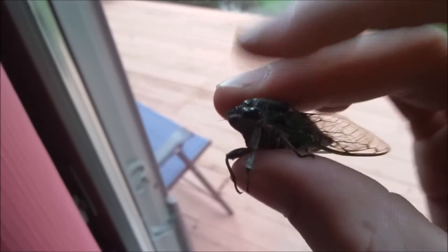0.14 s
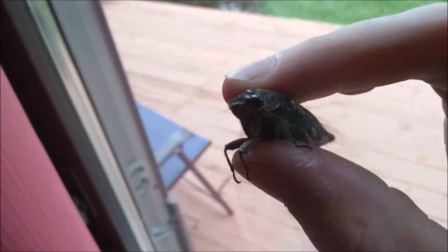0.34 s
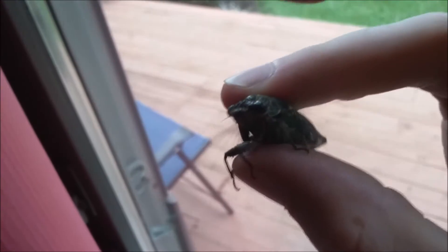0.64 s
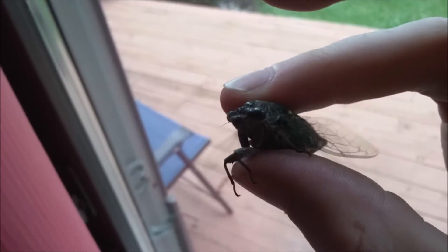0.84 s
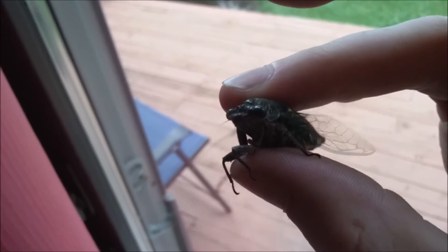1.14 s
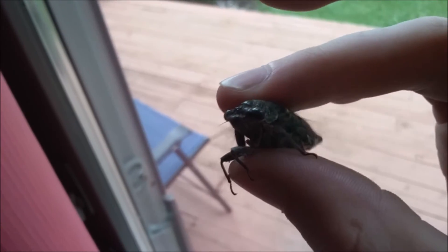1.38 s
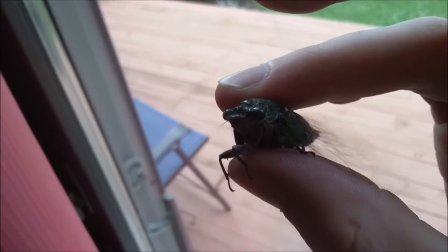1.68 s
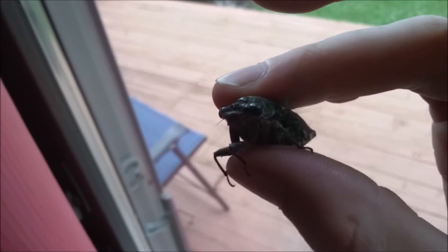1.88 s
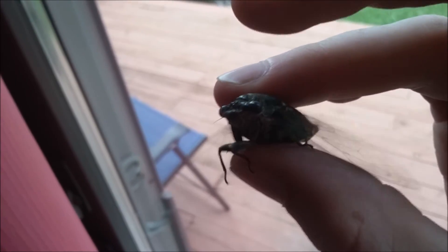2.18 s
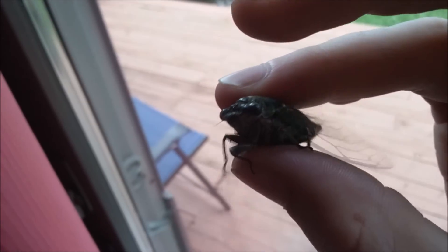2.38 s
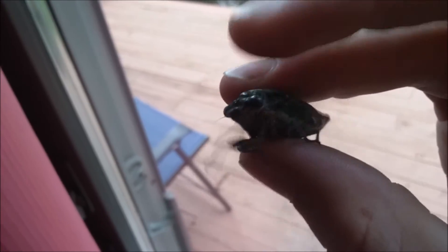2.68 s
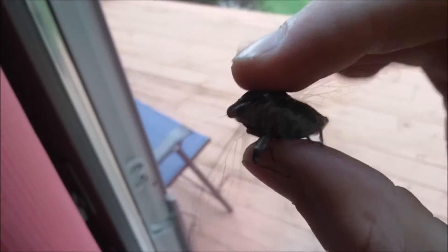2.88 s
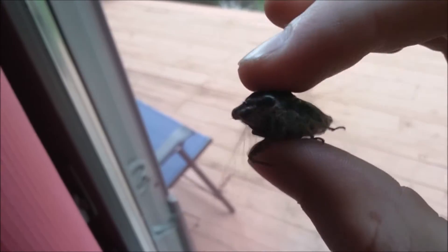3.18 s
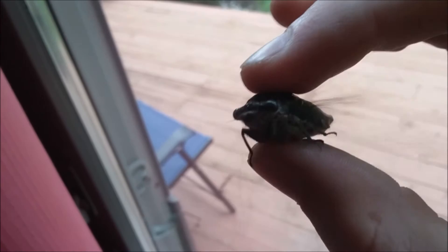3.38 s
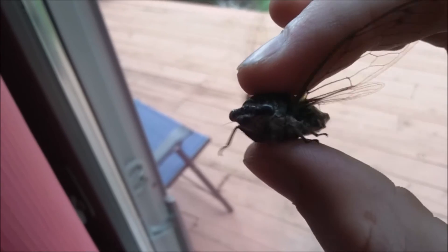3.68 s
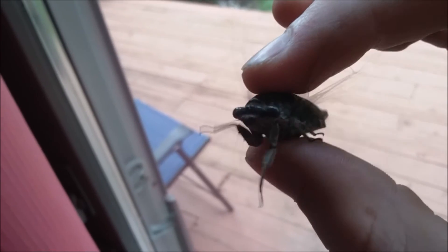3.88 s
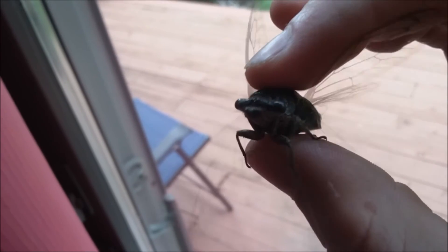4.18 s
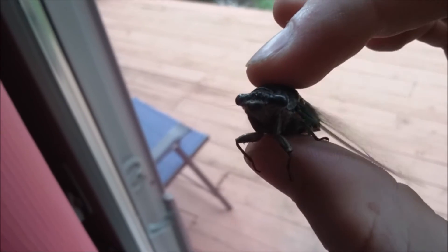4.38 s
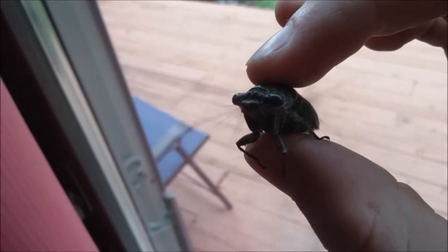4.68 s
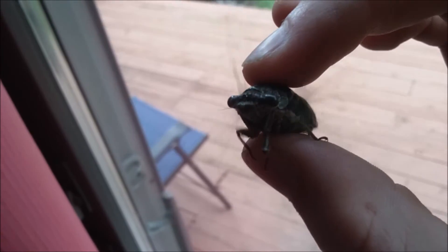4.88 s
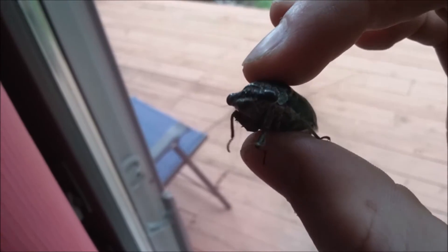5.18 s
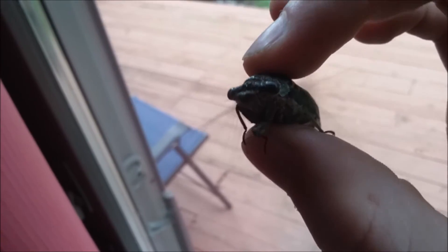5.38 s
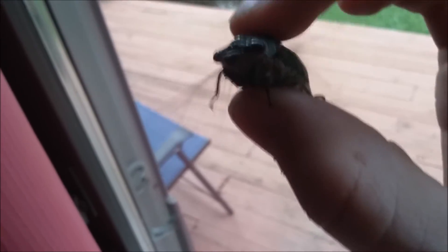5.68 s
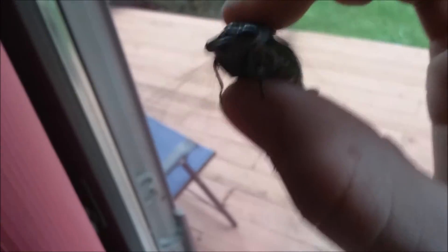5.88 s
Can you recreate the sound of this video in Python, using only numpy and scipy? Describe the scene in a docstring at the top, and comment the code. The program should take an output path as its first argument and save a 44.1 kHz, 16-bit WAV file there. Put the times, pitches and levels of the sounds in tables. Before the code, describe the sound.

Stiff insect wings slap against skin at close range: soft papery flutters first, then hard dry clicks with thin, hissy crackle, uneven and nervous. Fine rustling fills the gaps, and each stroke pushes a soft low flutter of air with a dim droning tone. The beating grows steady and rapid, ending in a buzzing rattle at nearly forty beats a second. The background is a quiet, low ambience.

```python
"""Cicada held in a doorway

A cicada held between finger and thumb beats its wings close to the microphone, in fits, then in a fast rattle.
Each hard contact is a noise burst around a sharp click, where a stiff wing bends and snaps; glancing contacts
are soft swells of tiny slips, and clumped noise rustles in between. The moved air is puffs and noisy eddies that
excite low room resonances, joined by two wavering tones. Faint reflections and quiet ambience lie behind."""
import sys
import numpy as np
from scipy import signal
from scipy.fft import rfft, irfft
from scipy.io import wavfile
from scipy.ndimage import uniform_filter1d

SR = 44100
rng = np.random.default_rng(int(sys.argv[2]) if len(sys.argv) > 2 else 0)


def wav_out(sig):
    """Save sig, one row per channel (or a flat mono array), as 16-bit PCM at SR to the path in sys.argv[1]."""
    wavfile.write(sys.argv[1], SR, np.round(np.clip(np.atleast_2d(sig).T, -1, 1) * 32767).astype(np.int16))


N = 266364
CONTACT_S = .005   # the energy of a contact counts as spread over this time when its level is set
AGE = np.arange(1536) / SR   # seconds since the start of one contact
CUTOFF_HZ = 16500   # top of the recorded band

# Air moved by the wings. Each row: time in seconds, level in dB.
DRAUGHT = [(0.0, -74), (0.05, -64.5), (0.2, -67.5), (0.5, -48.5), (0.84, -45), (0.99, -63), (1.04, -51),
           (1.21, -46), (1.97, -50.5), (2.17, -45), (2.37, -55), (2.49, -49), (2.51, -44), (2.84, -54.5),
           (3.33, -51), (3.35, -54.5), (4.41, -47.5), (4.49, -60), (4.54, -47), (6.04, -45)]
# Colour of wing veins brushing the skin. Each row: frequency in Hz, relative density in dB per Hz.
BRUSH_COLOUR = [(4400, -59), (7500, -19), (8500, -13), (9500, 1.5), (12000, 5.5), (12800, 9.5), (15000, 14),
                (15800, 13), (16400, -62)]
# Colour of the wing membrane. Each row: frequency in Hz, relative density in dB per Hz.
MEMBRANE_COLOUR = [(300, -14.5), (520, -1.5), (800, 1), (1200, -0.5), (1550, -3.5), (1900, 1), (2900, 3.5),
                   (3200, 0), (3550, 4), (4200, 1), (4800, -3), (6800, 1.5), (7500, -2), (8500, 0.5),
                   (11000, -12)]


def from_db(db):
    """Decibels to amplitude gain."""
    return 10 ** (np.asarray(db) / 20)


def rms_one(x):
    """Scale to rms 1."""
    return x / np.sqrt(np.mean(x ** 2) + 1e-20)


def in_time(rows):
    """Each value column of a curve, interpolated at every sample."""
    s, *columns = np.transpose(rows)
    return [np.interp(np.arange(N) / SR, s, column) for column in columns]


def coloured(x, points):
    """Causal (minimum-phase) filter with the given spectrum, along the last axis."""
    hz, db = np.transpose(points)
    grid = np.maximum(np.fft.rfftfreq(8192, 1 / SR), 1)
    gain = from_db(np.interp(np.log(grid), np.log(hz), db))
    # folding the cepstrum onto positive times makes the response minimum-phase
    cepstrum = irfft(np.log(gain))
    half = len(cepstrum) // 2
    cepstrum[1:half] *= 2
    cepstrum[half + 1:] = 0
    response = irfft(np.exp(rfft(cepstrum)))[:min(half, x.shape[-1])]
    filtered = signal.fftconvolve(np.atleast_2d(x), response[None], axes=1)
    return filtered[:, :x.shape[-1]].reshape(x.shape)


def resonance(x, hz, width_hz):
    """Two-pole resonance with gain 1 on top."""
    r = np.exp(-np.pi * width_hz / SR)
    numerator = np.array([1, 0, -1]) * (1 - r * r) / 2
    return signal.lfilter(numerator, [1, -2 * r * np.cos(2 * np.pi * hz / SR), r * r], x)


def grains(shape, uneven_db):
    """Dense tiny slips of uneven size; rms 1."""
    size_db = uneven_db * np.clip(rng.standard_normal(shape), -2, 2)
    return rms_one(rng.standard_normal(shape) * from_db(size_db))


def placed(sounds, times, levels_db):
    """Set each short sound to its level and lay it at its time."""
    out = np.zeros(N + 2 * len(AGE))
    for sound, s, db in zip(sounds, times, levels_db):
        at = max(round(s * SR), 0)
        contact_rms = np.sqrt(np.sum(sound ** 2) / (CONTACT_S * SR))
        out[at:at + len(AGE)] += from_db(db) * sound / contact_rms
    return out[:N]


def struck_spots(sounds, low_hz, high_hz, width_hz, gain_db):
    """Every contact meets another spot of the wing and brings out a resonance of its own."""
    centres = np.minimum(low_hz * (high_hz / low_hz) ** rng.random(len(sounds)), CUTOFF_HZ)
    return [x + from_db(gain_db) * resonance(x, hz, width_hz) for x, hz in zip(sounds, centres)]


def contacts():
    """All touches -> (hard hits in order of time, soft brushing sounds)."""
    # Fitful single snaps. Each row: time in seconds, then crackle, membrane and backstroke level in dB.
    wing_beats = [(0.3136, -35.5, -43, -68), (0.4241, -39, -55, -49), (0.8125, -33.5, -45, -43),
                  (1.3972, -33.5, -44.5, -44), (1.5561, -35, -46.5, -48), (1.7539, -30.5, -34, -46),
                  (1.8225, -24, -32, -63), (1.8745, -30.5, -35.5, -50), (1.9324, -34, -39, -55),
                  (2.0614, -28.5, -38, -41), (2.1554, -25, -37, -43), (2.1879, -30, -39, -41),
                  (2.2189, -23.5, -36.5, -41), (2.331, -25.5, -32.0, -52), (2.4148, -24.5, -34.0, -58),
                  (2.4581, -25, -35.5, -49), (2.5538, -33, -37, -44), (2.5799, -24, -32.5, -42),
                  (2.6308, -25, -36, -40), (2.6752, -32.5, -39, -36), (2.7346, -27.5, -34.5, -41),
                  (2.7836, -28.5, -38.5, -39.5), (2.8784, -29.5, -50.5, -53), (2.9351, -33.5, -44.5, -43),
                  (2.996, -22.5, -39, -42), (3.0322, -23.5, -40, -40), (3.0762, -26.5, -36.5, -41),
                  (3.1411, -28, -38.5, -50), (3.208, -26.5, -36, -43.5), (3.2762, -24, -39.5, -40),
                  (3.3096, -27.5, -38.5, -56), (3.3802, -25.5, -40.0, -37.5), (3.4557, -28, -40.5, -38.5),
                  (3.5095, -21, -35.5, -55), (3.5815, -27, -38, -40.5), (3.6439, -27, -40, -39.5),
                  (3.6856, -31.5, -39, -61), (3.7532, -28.5, -40, -35.5), (3.8296, -26.5, -42, -41.5),
                  (3.8636, -30.5, -46, -41), (3.9452, -35, -49, -40.5), (3.971, -26.5, -40.5, -40.5),
                  (4.0214, -27.5, -41.5, -38), (4.046, -23.5, -37.5, -42.5), (4.0806, -21, -36.5, -45),
                  (4.1286, -26, -37.5, -50), (4.2273, -26, -33.5, -36), (4.2475, -33, -37, -64),
                  (4.3187, -30, -38.5, -44), (4.3455, -24, -36, -36), (4.3818, -27.5, -39.5, -46),
                  (4.4163, -26, -31.5, -52), (4.5004, -31, -38.5, -55), (4.5866, -28.5, -38, -47.5),
                  (4.6211, -27.5, -37.5, -44), (4.6534, -28, -36.5, -53), (4.7084, -25, -36, -48),
                  (5.0721, -32.5, -34, -42)]
    # Runs of even, snapping beats. Each row: first and last beat in seconds, beats per second,
    # then crackle, membrane and backstroke level in dB.
    rattles = [(1.644, 1.709, 30, -34, -40.5, -52), (4.751, 4.814, 32, -26.5, -39.5, -41.5),
               (4.851, 4.909, 34, -28, -41, -46), (4.967, 5.026, 34, -22.5, -39, -44.5),
               (5.109, 5.241, 38, -25, -39, -41.5), (5.268, 5.538, 37, -22.5, -37, -43),
               (5.570, 5.681, 36, -26, -38.5, -38), (5.710, 6.026, 38, -23, -35.5, -41.5)]
    # Runs of softer sounds, most of them wings brushing the skin; those from 2.482 and 4.176 s are brief
    # smeared swishes. Each row: first and last beat in seconds, beats per second, then crackle and membrane
    # level in dB.
    flutters = [(0.367, 0.438, 28, -40, -51), (0.500, 0.685, 32, -47.5, -47.5),
                (0.711, 0.834, 32, -42, -43.5), (0.870, 0.920, 20, -42, -54), (1.029, 1.061, 31, -46, -50),
                (1.111, 1.351, 21, -39.5, -43), (1.381, 1.513, 30, -58, -47), (1.954, 1.996, 24, -41, -44),
                (2.072, 2.106, 59, -39, -41), (2.255, 2.292, 27, -44, -50),
                (2.482, 2.532, 40, -31.5, -47.5), (4.176, 4.213, 54, -33, -39.5),
                (4.536, 4.552, 62, -38, -51), (4.926, 4.939, 77, -38, -40)]
    hits = np.vstack([wing_beats, beats(rattles)])
    hits = hits[np.argsort(hits[:, 0])]
    return hits, np.vstack([backstrokes(hits), beats(flutters)])


def beats(runs, jitter_s=.0003, spread_db=2.16):
    """Fill each run with nearly even beats -> rows (s, the run's levels in dB)."""
    rows = []
    for first, last, per_s, *levels_db in runs:
        count = round((last - first) * per_s) + 1
        rows += [(s, *levels_db) for s in np.linspace(first, last, count)]
    rows = np.array(rows)
    chance = rng.standard_normal(rows.shape)
    times = rows[:, 0] + jitter_s * chance[:, 0]
    return np.column_stack([times, rows[:, 1:] + spread_db * chance[:, 1:]])


def backstrokes(hits, lead_share=.36, lead_max_s=.029, pause_s=.09):
    """Before a snap the returning wing brushes the skin -> rows (s, crackle dB, membrane dB)."""
    # Crackle and membrane level in dB, relative to the strength of the backstroke.
    parts_db = (3, 0.5)
    s, _, _, backstroke_db = hits.T
    beat_s = np.diff(s)
    lead = np.minimum(lead_share * beat_s, lead_max_s)
    touches = np.column_stack([s[1:] - lead, backstroke_db[1:, None] + np.array(parts_db)])
    return touches[beat_s < pause_s]   # after a longer rest the wing starts with the snap itself


def snaps(hits):
    """Hard contacts -> (bright crack of the veins, lower and longer sound of the membrane)."""
    # Colour of the snapped veins. Each row: frequency in Hz, relative density in dB per Hz.
    snap_colour = [(4400, -69), (7500, -40), (8400, -15.5), (10600, -1.5), (13500, 3), (15200, 3),
                   (16100, -10), (16800, -16)]
    s, crackle_db, membrane_db, _ = hits.T
    veins = snap_sounds(len(s), snap_colour, click_db=3.0, t60=0.014, uneven_db=2.5, bend_db=-4.0)
    veins = struck_spots(veins, 10800, 16500, width_hz=5900, gain_db=4.5)
    membrane = snap_sounds(len(s), MEMBRANE_COLOUR, click_db=-4.0, t60=0.02, uneven_db=3.0, bend_db=-6.5)
    membrane = struck_spots(membrane, 2840, 6200, width_hz=740, gain_db=-1.0)
    return np.array([placed(veins, s, crackle_db), placed(membrane, s, membrane_db)])


def snap_sounds(count, colour, click_db, t60, uneven_db, bend_db, bend_s=.0012):
    """The wing bends for a millisecond, buckles sharply, then crackles as it springs back."""
    since = AGE - bend_s
    bending = from_db(bend_db) * (AGE / bend_s) ** 2
    springing_back = from_db(-60 * np.abs(since) / t60)
    slips = grains((count, len(AGE)), uneven_db) * np.where(since < 0, bending, springing_back)
    slips /= np.sqrt(np.sum(slips ** 2, axis=1, keepdims=True))
    slips[:, round(bend_s * SR)] = from_db(click_db + rng.normal(0, 0.97, count))   # the buckling click
    return coloured(slips, colour)


def brushes(touches):
    """Soft brushing sounds, softer and longer than the snaps -> (veins, membrane)."""
    s, crackle_db, membrane_db = touches.T
    veins = brush_sounds(len(s), BRUSH_COLOUR, rise_s=0.00098, t60=0.029, uneven_db=15.0)
    veins = struck_spots(veins, 9400, 14000, width_hz=1200, gain_db=5.0)
    membrane = brush_sounds(len(s), MEMBRANE_COLOUR, rise_s=0.0013, t60=0.023, uneven_db=0.5)
    membrane = struck_spots(membrane, 1540, 4160, width_hz=410, gain_db=6.0)
    return np.array([placed(veins, s, crackle_db), placed(membrane, s, membrane_db)])


def brush_sounds(count, colour, rise_s, t60, uneven_db):
    """A short swell of slips as the wing meets the skin and slides off."""
    pressure = (1 - np.exp(-(AGE / rise_s) ** 2)) * from_db(-60 * AGE / t60)
    return coloured(grains((count, len(AGE)), uneven_db) * pressure, colour)


def rustle(per_s=150, t60=0.017, bed=0.11):
    """Countless faint touches of wings and legs, in small clumps -> (veins, membrane)."""
    # Rustle between the contacts. Each row: time in seconds, vein level in dB.
    rustle_curve = [(0, -84), (0.29, -95), (0.34, -53), (0.69, -44.5), (0.92, -52), (0.99, -74), (1.1, -55),
                    (1.3, -52), (2.07, -42.5), (2.24, -44), (2.39, -55.5), (2.57, -38), (2.82, -54),
                    (3.8, -58.5), (4.36, -46.5), (4.49, -52), (4.58, -55), (4.83, -46.5), (6.04, -41.5)]
    level_db, = in_time(rustle_curve)
    touches = (rng.random(N) < per_s / SR) * rng.random(N)
    fading = signal.lfilter([1], [1, -from_db(-60 / (t60 * SR))], touches + 1e-18)
    clumps = rms_one(bed + rms_one(fading))
    veins = rms_one(coloured(grains(N, uneven_db=17.0) * clumps, BRUSH_COLOUR))
    membrane = rms_one(coloured(grains(N, uneven_db=3.5) * clumps, MEMBRANE_COLOUR))
    return np.array([from_db(level_db) * veins, from_db(level_db - 8.5) * membrane])


def wing_sound(hits, touches):
    """Veins and membrane together, with wing modes that speak more or less as the grip changes."""
    # Strength of the wing modes under the changing grip. Each row: time in seconds, level in dB.
    grip = [(0, -28), (1.4, -4), (2.6, -28), (3.3, -10.5), (4.3, 1.5), (6.04, -3.5)]
    # Resonances of the held wing, low then high. Each row: frequency in Hz, width in Hz.
    wing_modes = [(930, 520), (3900, 650)]
    veins, membrane = snaps(hits) + brushes(touches) + rustle()
    grip_db, = in_time(grip)
    low_mode, high_mode = (resonance(membrane, hz, width_hz) for hz, width_hz in wing_modes)
    modes = low_mode + from_db(-11.5) * high_mode
    return veins + from_db(-1.5) * membrane + from_db(grip_db) * modes


def air(times, puff_s=0.0011, eddies_db=6.0, eddy_t60=0.078, bed=0.63):
    """Every stroke throws a puff and a wake of eddies; the room's low resonances ring on."""
    # Colour of the moved air. Each row: frequency in Hz, relative density in dB per Hz.
    air_colour = [(15, -24), (35, -31), (60, -4.5), (72, -5.5), (85, -2.5), (150, 0.5), (230, -2.5),
                  (300, -5.5), (420, -6), (510, -14.5), (750, -18.5), (1300, -28.5)]
    # Low resonances of the room. Each row: frequency in Hz, gain in dB.
    room_modes = [(119.5, -1.5), (172, 3.5), (207, -7), (231, 7), (259, 1.5)]
    level_db, = in_time(DRAUGHT)
    strengths_db = rng.normal(0, 1.03, len(times))
    puffs = placed([-AGE * np.exp(-AGE / puff_s)] * len(times), times, strengths_db)
    wake = bed + rms_one(placed([from_db(-60 * AGE / eddy_t60)] * len(times), times, strengths_db))
    eddies = rms_one(coloured(wake * rng.standard_normal(N), air_colour))
    flow = rms_one(coloured(puffs, air_colour)) + from_db(eddies_db) * eddies
    # the draught sets the overall strength, however many strokes make it up
    running_rms = np.sqrt(uniform_filter1d(flow ** 2, size=4000) + 1e-9)
    flutter = from_db(level_db) * flow / running_rms
    return flutter + sum(from_db(db) * resonance(flutter, hz, width_hz=4) for hz, db in room_modes)


def hum(waver=0.62, ring_s=0.04):
    """Two narrow tones that follow the moved air and waver in strength and phase."""
    # Hum relative to the moved air. Each row: time in seconds, lower and upper tone level in dB.
    hum_curve = [(0, -14, -8.5), (0.8, -15, -16), (1.15, -10, -8), (2.1, -7, -12), (2.6, -8, -15.5),
                 (3.4, -8.5, -16), (5.05, -7.5, -23.5), (6.04, -9, -14)]
    # Frequencies of the lower and upper tone in Hz.
    tones_hz = (357.6, 410.4)
    draught_db, = in_time(DRAUGHT)
    keep = np.exp(-1 / (ring_s * SR))
    drive = signal.lfilter([1 - keep], [1, -keep], from_db(draught_db))   # lingers behind the draught
    knots = np.linspace(0, N / SR, num=60)
    tones = 0
    for hz, level_db in zip(tones_hz, in_time(hum_curve)):
        # chance parts in and out of phase, drawn about every tenth of a second, swell or partly cancel the tone
        along, across = in_time(np.column_stack([knots, rng.standard_normal((len(knots), 2))]))
        phase = 2 * np.pi * hz * np.arange(N) / SR
        tone = (1 + waver * along) * np.sin(phase) + waver * across * np.cos(phase)
        tones = tones + from_db(level_db) * rms_one(tone)
    return drive * tones


def room(x, t60=0.044, wet_db=-17.0):
    """Faint diffuse reflections from the door frame and the room behind: decaying, dulled noise."""
    age = np.arange(SR // 3) / SR
    tail = rng.standard_normal(len(age)) * from_db(-60 * age / t60) * (age > .004)
    tail /= np.sqrt(np.sum(tail ** 2))
    tail = signal.sosfilt(signal.butter(1, 7000, fs=SR, output="sos"), tail)
    return from_db(wet_db) * signal.fftconvolve(x, tail)[:N]


def ambience(level_db=-68.5):
    """Quiet, steady background: coloured noise."""
    # Colour of the background. Each row: frequency in Hz, relative density in dB per Hz.
    ambience_colour = [(18, -80), (30, -38), (75, -1.5), (233, 3.5), (295, -24), (415, -15), (499, -40),
                       (937, -17.5), (4780, -44), (14000, -14), (16000, -26)]
    return from_db(level_db) * rms_one(coloured(rng.standard_normal(N), ambience_colour))


def scene():
    """Wings close to the microphone over a quiet background."""
    hits, touches = contacts()
    wings = wing_sound(hits, touches)
    strokes = np.concatenate([hits[:, 0], touches[:, 0]])
    return (wings + room(wings) + air(strokes) + hum() + ambience())[None]


def record(dry):
    """A steep elliptic low-pass cuts the top."""
    return signal.sosfilt(signal.ellip(10, .2, 80, CUTOFF_HZ, fs=SR, output="sos"), dry)


dry = scene()
out = record(dry)
wav_out(out)
```